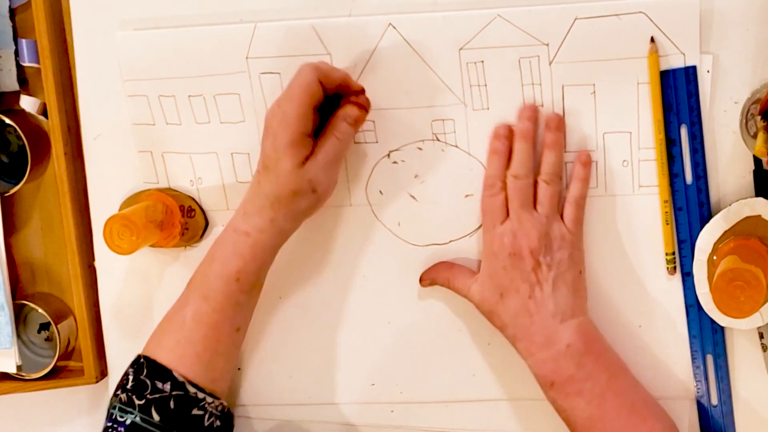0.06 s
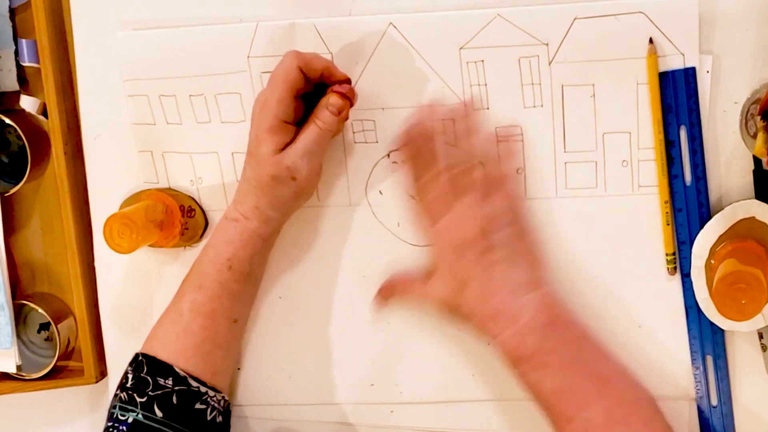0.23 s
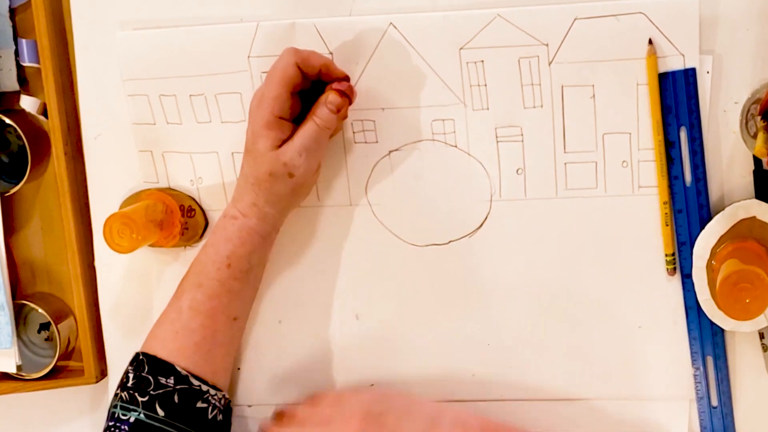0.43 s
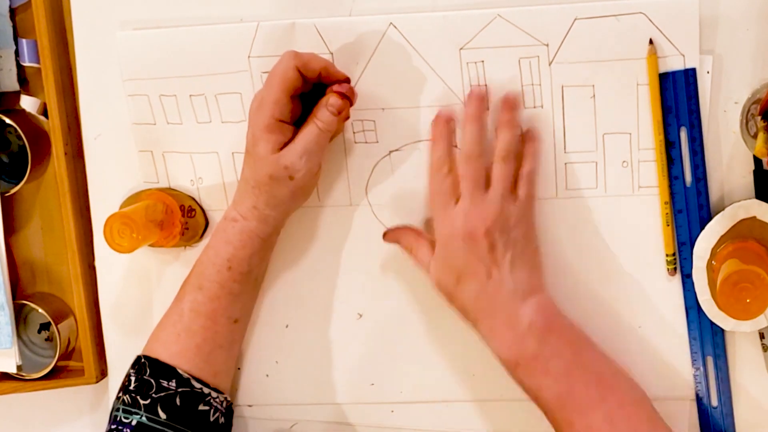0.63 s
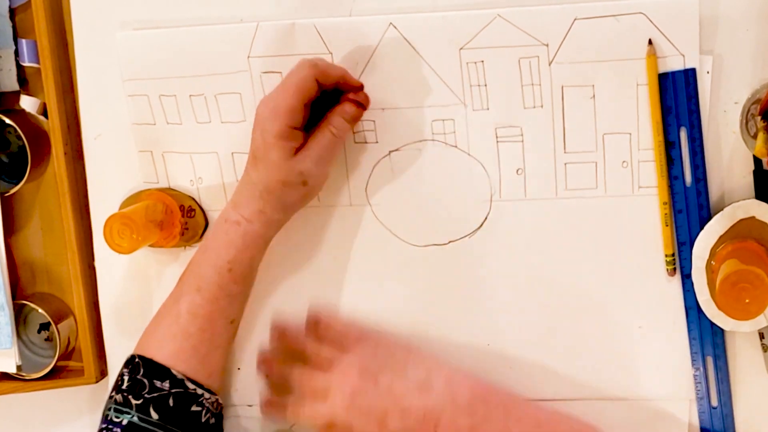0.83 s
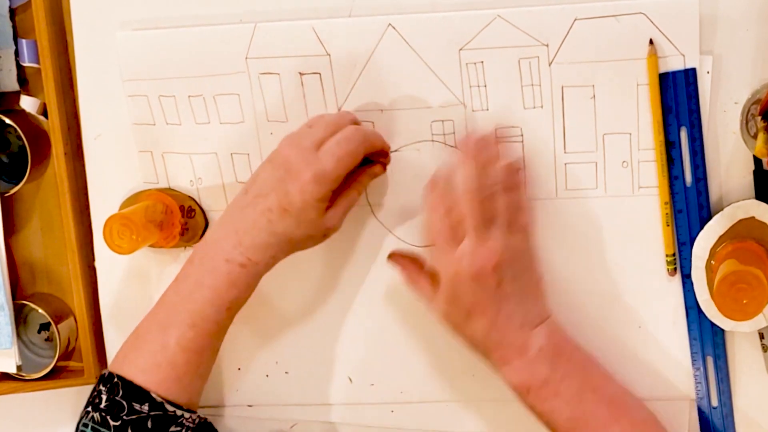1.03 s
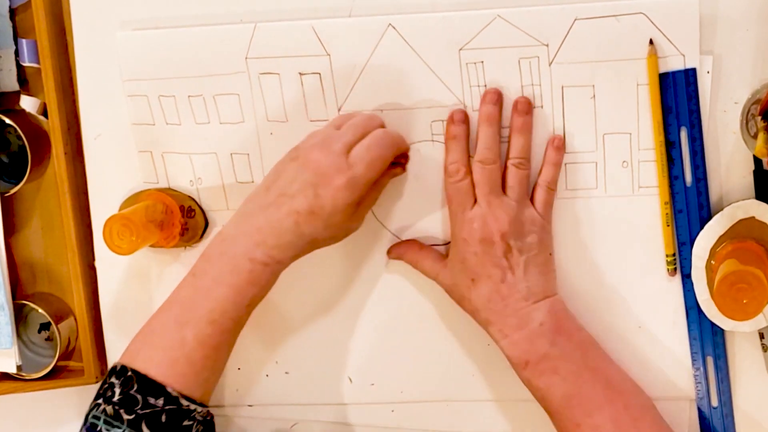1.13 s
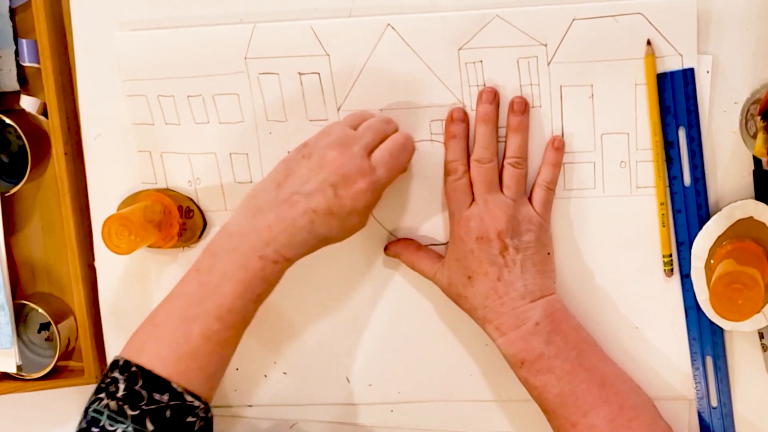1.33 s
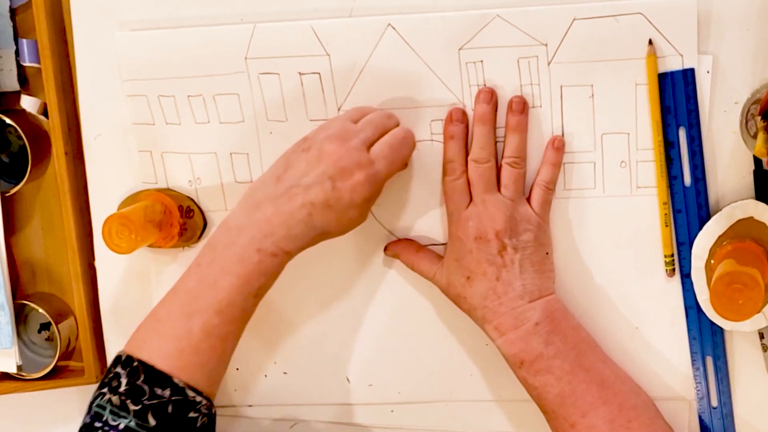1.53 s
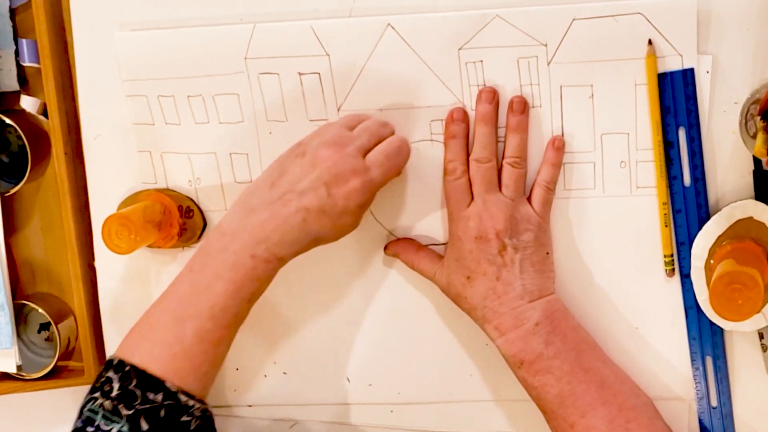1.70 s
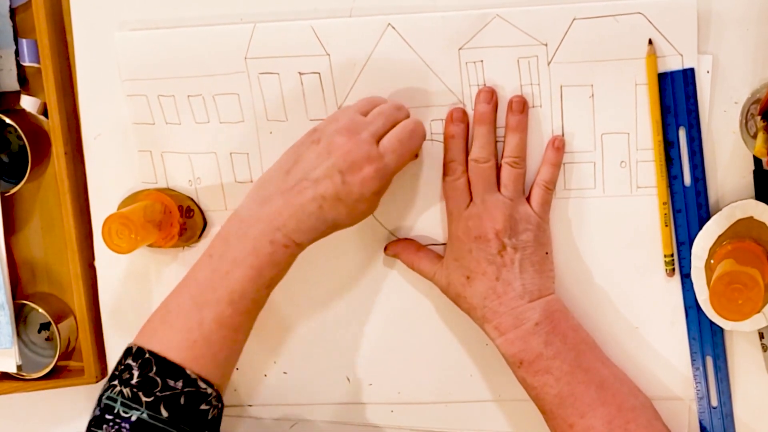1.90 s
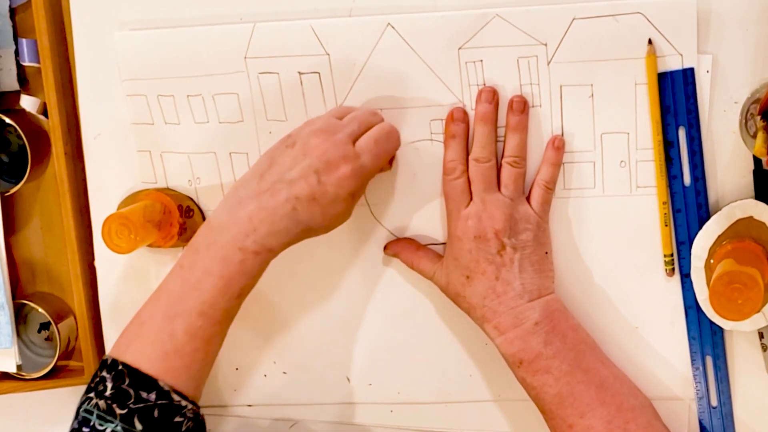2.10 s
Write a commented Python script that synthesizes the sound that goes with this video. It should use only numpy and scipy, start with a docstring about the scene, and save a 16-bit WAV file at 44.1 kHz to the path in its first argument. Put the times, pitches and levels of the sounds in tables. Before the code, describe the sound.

A hand brushes eraser crumbs off drawing paper in two quick swishes, then the sheet crackles.

```python
"""A hand sweeps over drawing paper in two quick passes, brushing off eraser crumbs, then settles.
Skin and eraser hiss by friction, as grainy noise swelling and fading with each stroke's speed.
The dragged sheet scuffs in resonant bands, the table thuds when leant on, the paper buckles in
a run of short snaps, and a few light eraser strokes are heard around it. A small room answers
with a decaying tail; a wavering appliance hum, low rumble and faint air lie beneath."""
import sys
import numpy as np
from scipy import signal
from scipy.fft import rfft, irfft, next_fast_len
from scipy.io import wavfile
from scipy.ndimage import map_coordinates

SR = 44100
rng = np.random.default_rng(int(sys.argv[2]) if len(sys.argv) > 2 else 0)


def to_wav(s):
    """Save 16-bit WAV."""
    ch = np.atleast_2d(s).T  # columns
    pcm = np.round(np.clip(ch, -1, 1) * 32767)  # PCM
    wavfile.write(sys.argv[1], SR, pcm.astype(np.int16))


N = 94815
T = np.arange(N) / SR  # time in seconds


def amp(db):
    """Level as amplitude: every 20 dB is a factor of ten."""
    return 10 ** (np.asarray(db) / 20)


def unit(x):
    """Normalisation by power: x scaled to rms 1."""
    return x / np.sqrt(np.mean(x ** 2) + 1e-20)


def along(points, hz):
    """Logarithmic frequency scale: (Hz, value) points interpolated on it."""
    point_hz, values = np.transpose(points)
    return np.interp(np.log(hz + 1), np.log(point_hz + 1), values)


def wobble(rate):
    """Slow random modulation: a smooth curve through `rate` random knots a second."""
    knots = rng.standard_normal(int(N * rate / SR) + 4)
    return map_coordinates(knots, [T * rate])


def filtered(x, response):
    """Linear filtering: the spectrum of x times a response of frequency."""
    size = next_fast_len(N + SR // 2)
    spectrum = rfft(x, size) * response(np.fft.rfftfreq(size, 1 / SR))
    return irfft(spectrum, size)[..., :N]


def coloured(pair, spectrum, alike, side):
    """Interaural coherence: mid and side shares of two unrelated signals set colour, width and balance."""
    def mid_and_side(hz):
        turn = np.arccos(np.clip(along(alike, hz), -1, 1)) / 2
        return amp(along(spectrum, hz)) * [np.cos(turn), np.sin(turn)]

    mid, difference = filtered(pair, mid_and_side)
    stereo = np.array([mid + difference, mid - difference])
    # half the left-minus-right level goes to each side, with opposite signs
    return unit(filtered(stereo, lambda hz: amp(np.outer([.5, -.5], along(side, hz)))))


def noise():
    """White noise: two unrelated channels with equal power at all frequencies."""
    return rng.standard_normal((2, N))


GRAINS_PER_S, GRAIN_SPREAD_DB = 9000, 2.5  # paper fibres that catch and let go
GRAIN_SHARE = 0.39  # share of the power in grains
JUDDER_DB, JUDDER_PER_S = 0.15, 240


def friction():
    """Stick-slip friction: countless tiny slips of uneven size over a smooth rush, juddering slightly."""
    caught = rng.random((2, N)) < GRAINS_PER_S / SR
    size_db = GRAIN_SPREAD_DB * np.minimum(rng.exponential(size=(2, N)), 5)
    slips = caught * np.sign(noise()) * amp(size_db)
    contact = np.sqrt(GRAIN_SHARE) * unit(slips) + np.sqrt(1 - GRAIN_SHARE) * noise()
    return contact * amp(JUDDER_DB * wobble(JUDDER_PER_S))


def swell(s, rise, fall):
    """Loudness follows speed: a bell peaking at s, with rise and fall as its standard deviations."""
    return np.exp(-.5 * ((T - s) / np.where(T < s, rise, fall)) ** 2)


def blows(rows, attack, t60):
    """Impact and exponential decay: blows start fast, die away and add by power."""
    power = 0
    for s, db in rows:
        age = np.maximum(T - s, 0)
        envelope = amp(db) * (1 - np.exp(-age / attack)) * np.exp(-np.log(1000) * age / t60)
        power = power + envelope ** 2
    return np.sqrt(power)


# Decay of the room. Each row: frequency in Hz, time to fall by 60 dB in seconds.
ROOM_DECAY = [(200, 0.33), (1500, 0.24), (5000, 0.28), (15000, 0.22)]
ROOM_DELAY_S = .006


def room(x, wet_db):
    """Reverberation: a decaying noise tail is convolved in, and the sum scaled back in power."""
    hz, t, z = signal.stft(rng.standard_normal((2, SR // 2)), SR, nperseg=256)
    decay = np.exp(-np.log(1000) * t / along(ROOM_DECAY, hz)[:, None])
    tail = signal.istft(z * decay, SR, nperseg=256)[1]
    tail = np.pad(tail / np.linalg.norm(tail[0]), ((0, 0), (int(ROOM_DELAY_S * SR), 0)))
    wet = signal.fftconvolve(x, tail, axes=1)[:, :N]
    return (x + amp(wet_db) * wet) / np.hypot(1, amp(wet_db))


# Partials of the appliance hum. Each row: frequency in Hz, mean level in dB.
HUM_PARTIALS = [(59.5, -64), (119.8, -56), (240, -66), (361.5, -66.5)]
HUM_WAVER_DB, HUM_DRIFT_RAD, HUM_WAVER_PER_S = 2, 0.44, 13
# Colours of rumble and air. Each row: frequency in Hz, relative level in dB per Hz.
RUMBLE_COLOUR = [(20, -17), (40, -13), (62, -2.5), (80, 2), (100, -4.5), (122, 5), (145, -9), (200, -3),
                 (250, -7.5), (320, -10.5), (375, -7), (440, -15.5), (520, -18.5), (750, -34), (1500, -67)]
AIR_COLOUR = [(300, -24), (600, 1), (1000, -1.5), (2000, -8), (4000, -13.5), (8000, -17), (10000, -17.5),
              (12000, -6), (15500, -8)]
RUMBLE_DB, AIR_DB = -54, -69
# Width of the background. Each row: frequency in Hz, left-right likeness from 0 to 1.
FLOOR_ALIKE = [(60, 0.95), (150, 0.99), (300, 0.91), (600, 0.27), (1500, 0.085), (4000, 0.033)]
# Balance, also of crinkle, eraser and snaps. Each row: frequency in Hz, left minus right in dB.
ROOM_SIDE = [(100, -1.5), (300, -5), (1000, -2), (4000, -3), (8000, -3), (15000, 0.7)]


def background():
    """Modulated partials over broadband noise: a wavering hum with low rumble and faint air."""
    hum = 0
    for hz, db in HUM_PARTIALS:
        level = amp(db + HUM_WAVER_DB * wobble(HUM_WAVER_PER_S))
        drift = HUM_DRIFT_RAD * wobble(HUM_WAVER_PER_S)
        hum = hum + level * np.sqrt(2) * np.sin(2 * np.pi * (hz * T + rng.random()) + drift)
    rumble = amp(RUMBLE_DB) * coloured(noise(), RUMBLE_COLOUR, FLOOR_ALIKE, ROOM_SIDE)
    air = amp(AIR_DB) * coloured(noise(), AIR_COLOUR, FLOOR_ALIKE, ROOM_SIDE)
    return hum + rumble + air


# Dull thuds through the table top. Each row: start in seconds, level in dB.
THUDS = [(.17, -40.5), (0.281, -45), (.42, -48), (1.39, -40)]
THUD_HZ, THUD_ATTACK_S, THUD_T60_S = 105, 0.0085, 0.13


def thuds():
    """Damped oscillation: the table top gives a few low swings when leant on."""
    out = 0
    for s, db in THUDS:
        swing = np.sqrt(2) * np.sin(2 * np.pi * THUD_HZ * (T - s))
        out = out + blows([(s, db)], THUD_ATTACK_S, THUD_T60_S) * swing
    return out


# Snaps of the buckling sheet. Each row: start in seconds, level in dB, treble lift in dB.
SNAPS = [(1.611, -36, -2), (1.619, -35.5, 0), (1.63, -36.5, 0), (1.6342, -34, 3), (1.642, -36.5, 0),
         (1.646, -35, -0.5), (1.654, -36, -2.5)]
# Colour of a snap. Each row: frequency in Hz, relative level in dB per Hz.
CRACKLE_COLOUR = [(300, -27), (550, -14.5), (720, -7.5), (880, 2), (1080, 1.5), (1220, -7), (1420, 2.5),
                  (1700, 1), (1970, -12), (2250, -14.5), (2600, -8), (3300, -12.5), (3850, -8.5),
                  (5000, -17.5), (7500, -19.5), (8800, -15), (13500, -18.5), (15800, -22)]
# Width of all sounds at the sheet. Each row: frequency in Hz, left-right likeness from 0 to 1.
SHEET_ALIKE = [(150, 0.69), (350, 0.85), (700, 0.5), (2000, 0.23), (5000, .0), (14000, 0.071)]
SNAP_ATTACK_S, SNAP_T60_S, SNAP_TREBLE_HZ, SNAP_WET_DB = .0004, 0.037, 5030, -0.5


def buckle():
    """Buckling instability: the sheet gives way in a quick run of dry snaps, some crisper than others."""
    out = np.zeros((2, N))
    for s, db, treble_db in SNAPS:
        burst = coloured(noise(), CRACKLE_COLOUR, SHEET_ALIKE, ROOM_SIDE)
        # the lift reaches half its dB at SNAP_TREBLE_HZ
        burst = filtered(burst, lambda hz: amp(treble_db * hz ** 2 / (hz ** 2 + SNAP_TREBLE_HZ ** 2)))
        out += blows([(s, db)], SNAP_ATTACK_S, SNAP_T60_S) * burst
    return room(out, SNAP_WET_DB)


# Colour of paper hiss. Each row: frequency in Hz, relative level in dB per Hz.
HISS_COLOUR = [(1500, -3.5), (2600, -20.5), (3300, -18.5), (4200, -17), (5600, -19), (7400, -15),
               (9500, -12.5), (10700, -9), (11800, -4), (13000, -6.5), (14600, -1.5), (15800, -3)]


def strokes(rows, side):
    """Friction noise of sliding contact: firmer contact reaches lower, slant scales the side balance."""
    out = np.zeros((2, N))
    for s, rise, fall, db, edge_hz, slant in rows:
        hiss = coloured(friction(), HISS_COLOUR, SHEET_ALIKE, np.array(side) * [1, slant])
        # steep high-pass at the lower edge
        hiss = filtered(hiss, lambda hz: (hz / edge_hz) ** 4 / np.hypot(1, (hz / edge_hz) ** 4))
        out += amp(db) * swell(s, rise, fall) * unit(hiss)
    return out


# Eraser on paper. Each row: fastest point in seconds, level in dB.
RUBS = [(1.40, -67.5), (1.905, -69.5), (2.07, -66.5)]
RUB_S, RUB_EDGE_HZ, RUB_SLANT = 0.025, 3400, 2.3  # rise and fall, lower edge of the hiss, slant
HAND_WET_DB = -7.5  # room tail, shared by eraser and hand


def eraser():
    """Sliding friction: light strokes of equal length hiss on the paper."""
    rows = [(s, RUB_S, RUB_S, db, RUB_EDGE_HZ, RUB_SLANT) for s, db in RUBS]
    return room(strokes(rows, ROOM_SIDE), HAND_WET_DB)


# The hand's weight drags the sheet over the table. Each row: peak in seconds, rise in seconds,
# fall in seconds, level in dB, centre of the scuff in Hz.
DRAGS = [(0.121, 0.0075, 0.012, -52, 760), (.16, 0.041, 0.015, -60, 1030), (0.203, 0.014, 0.018, -58, 1420),
         (0.299, 0.02, 0.032, -51, 876), (.342, 0.02, 0.017, -48, 1190), (.375, 0.0093, 0.025, -56.5, 1050),
         (.79, 0.058, 0.044, -67.5, 1400)]
# Colour of the scuffs. Each row: frequency in Hz, relative level in dB per Hz.
SCUFF_COLOUR = [(300, 10), (560, -8), (700, -4), (880, -0.5), (1250, -4.5), (1600, -4.5), (2200, -13),
                (3000, -9), (5000, -24)]
# Balance of the hand's sounds. Each row: frequency in Hz, left minus right in dB.
HAND_SIDE = [(200, 0.5), (1000, -2), (2000, -7), (4200, -1.5), (5600, -8.5), (6800, -8.5), (7700, -7),
             (8700, 3), (10200, 0), (11900, 2.5), (13400, 1.5), (14800, -2.5), (15800, -6.5)]
DRAG_Q = 1.52


def drags():
    """Resonance: friction noise excites a broad band of its own in each scuff of the sheet."""
    out = np.zeros((2, N))
    for s, rise, fall, db, centre_hz in DRAGS:
        scuff = coloured(friction(), SCUFF_COLOUR, SHEET_ALIKE, HAND_SIDE)
        scuff = filtered(scuff, lambda hz: 1 / (1 + 1j * DRAG_Q * (hz / centre_hz - centre_hz / (hz + 1))))
        out += amp(db) * swell(s, rise, fall) * unit(scuff)
    return out


# Hand on paper. Each row: fastest point in seconds, rise in seconds, fall in seconds, level in dB,
# lower edge of the hiss in Hz, slant to the microphones from 0 up.
SWEEPS = [(.112, 0.036, 0.074, -47, 5160, 2.3), (.18, 0.056, 0.098, -47, 5260, 1.1),
          (.246, 0.024, 0.024, -31.5, 4970, 2), (.295, 0.028, 0.041, -24.5, 4370, 0.68),
          (.35, 0.061, 0.033, -29.5, 2850, 0.57), (.635, 0.019, 0.061, -52.5, 8900, 1.6),
          (.738, 0.025, 0.033, -40.5, 6560, 1.5), (.781, 0.022, 0.036, -26.5, 4560, 0.4),
          (.84, 0.032, 0.031, -34, 3460, .8), (1.015, 0.029, 0.092, -49, 6260, 1.1),
          (1.17, 0.0049, 0.011, -50.5, 9000, .8), (1.196, 0.007, 0.013, -46, 5040, 2.4)]
# Fingers land and the sheet crinkles. Each row: peak in seconds, rise in seconds, fall in seconds,
# level in dB.
TOUCHES = [(1.175, 0.006, 0.015, -63.5), (1.206, 0.0073, 0.026, -56.5)]
# The arm comes down on the table. Each row: start in seconds, level in dB.
BUMPS = [(.122, -43.5), (.2, -48)]
BUMP_ATTACK_S, BUMP_T60_S = .005, .25
# Colours of crinkle and table. Each row: frequency in Hz, relative level in dB per Hz.
CRINKLE_COLOUR = [(500, -8), (1400, 3), (2000, -0.5), (3000, -6.5), (4500, -1.5), (7000, 0.5), (11000, 2),
                  (15800, -3.5)]
TABLE_COLOUR = [(100, -41), (200, -7), (300, -2.5), (390, 1.5), (520, -12), (800, -21), (1500, -37.5)]


def hand():
    """Friction and impact: skin hisses, the sheet drags and crinkles, and the arm bumps the table."""
    touch = sum(amp(db) * swell(s, rise, fall) for s, rise, fall, db in TOUCHES)
    crinkle = touch * coloured(friction(), CRINKLE_COLOUR, SHEET_ALIKE, ROOM_SIDE)
    thump = coloured(noise(), TABLE_COLOUR, SHEET_ALIKE, HAND_SIDE)
    bump = blows(BUMPS, BUMP_ATTACK_S, BUMP_T60_S) * thump
    on_paper = strokes(SWEEPS, HAND_SIDE) + drags() + crinkle
    return room(on_paper, HAND_WET_DB) + bump


def scene():
    """Superposition: all sounds at the drawing table add."""
    return background() + thuds() + buckle() + eraser() + hand()


TOP_HZ = 15850


def record(dry):
    """Band limitation: nothing is kept from TOP_HZ up."""
    return filtered(dry, lambda hz: hz < TOP_HZ)


dry = scene()
out = record(dry)
to_wav(out)
```